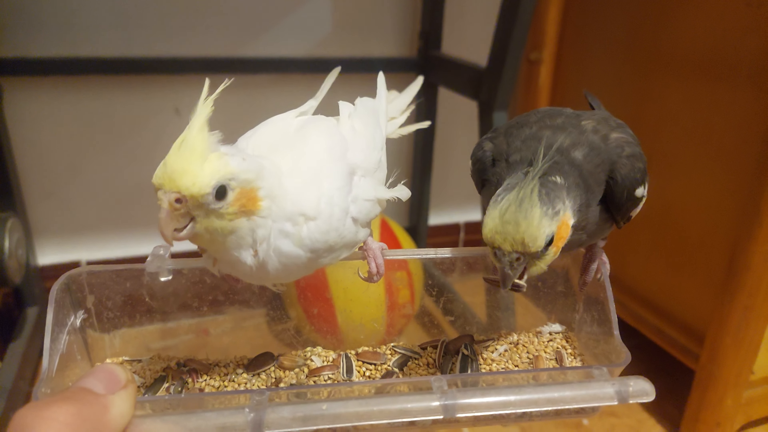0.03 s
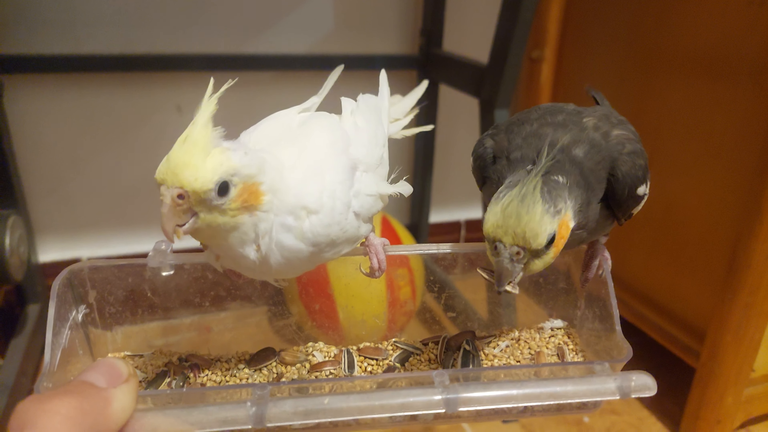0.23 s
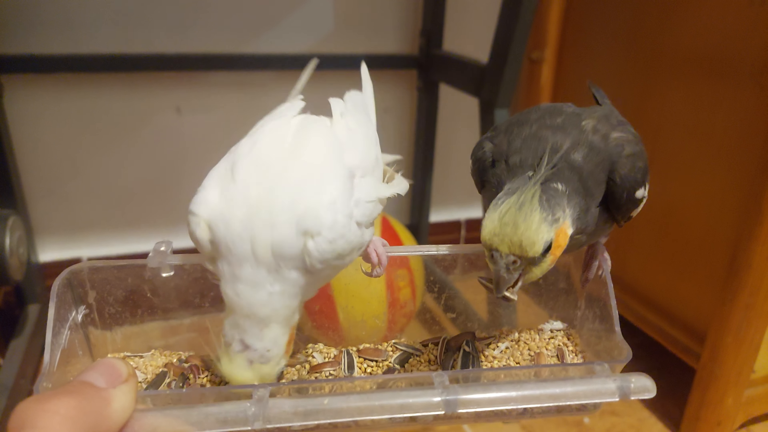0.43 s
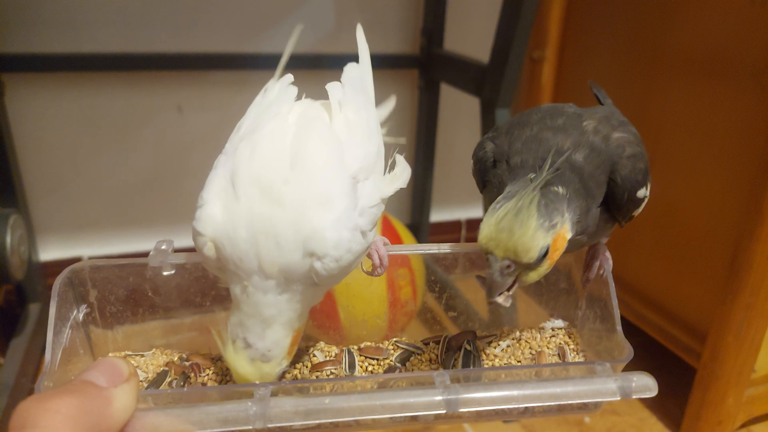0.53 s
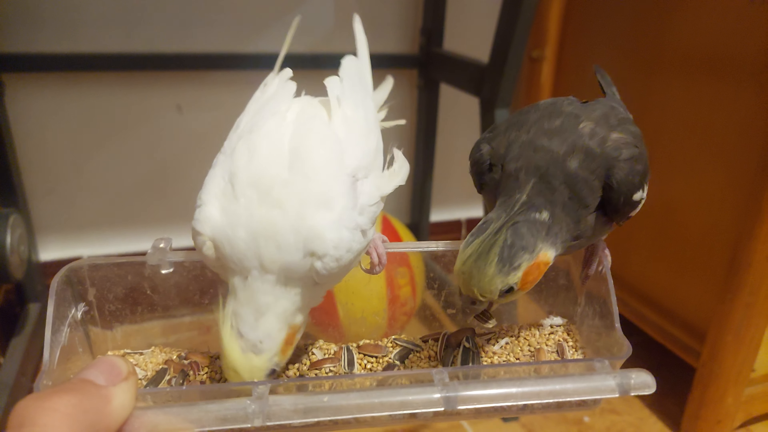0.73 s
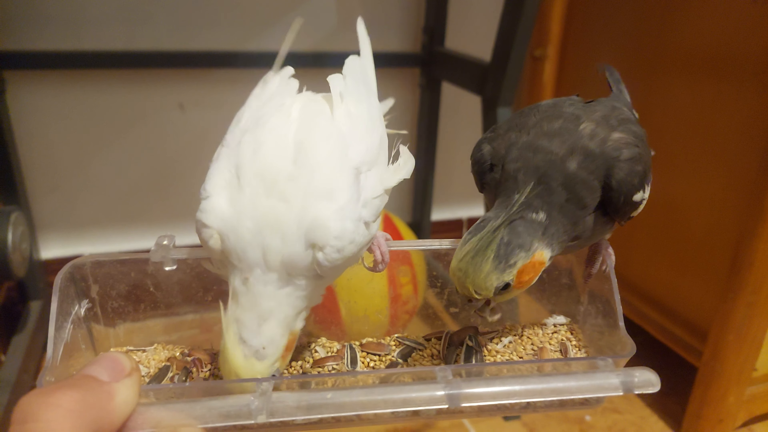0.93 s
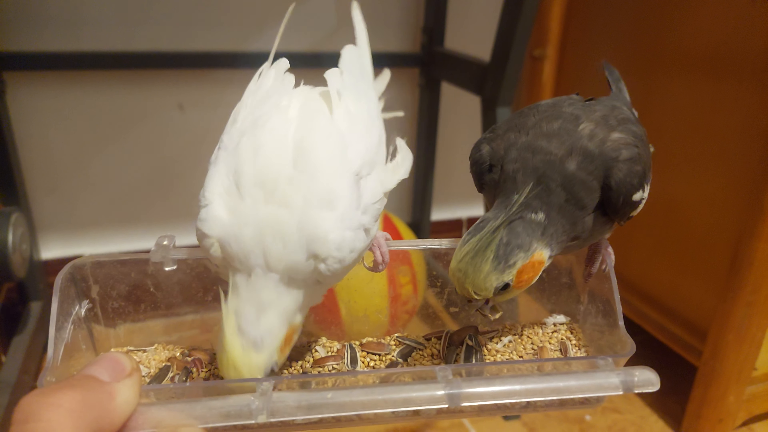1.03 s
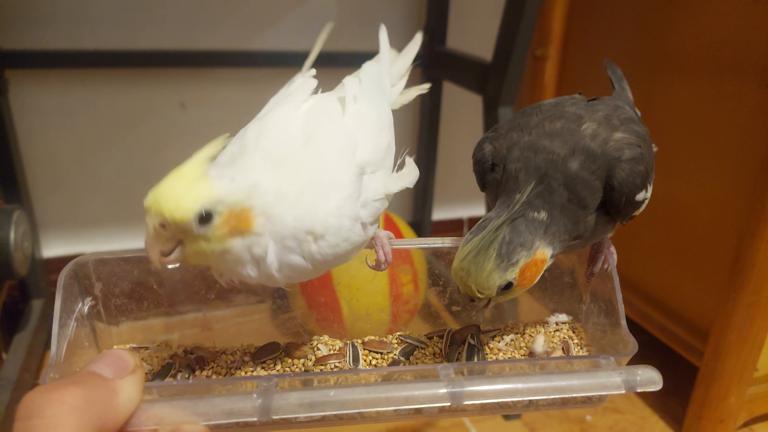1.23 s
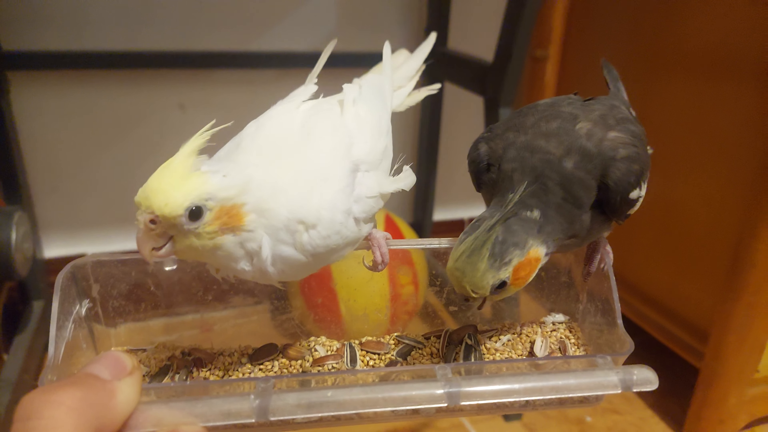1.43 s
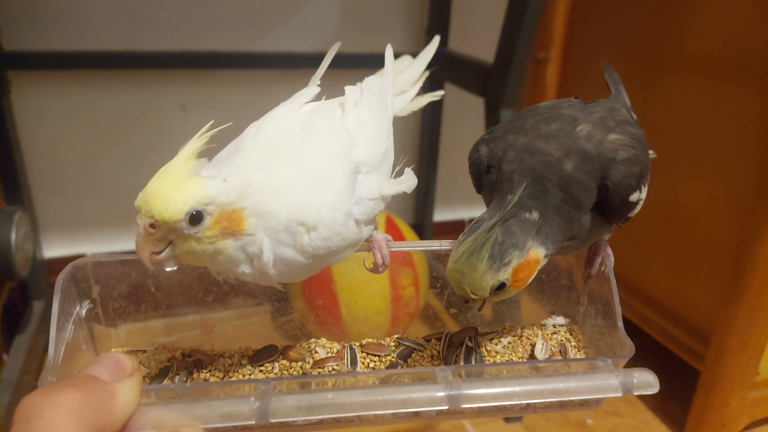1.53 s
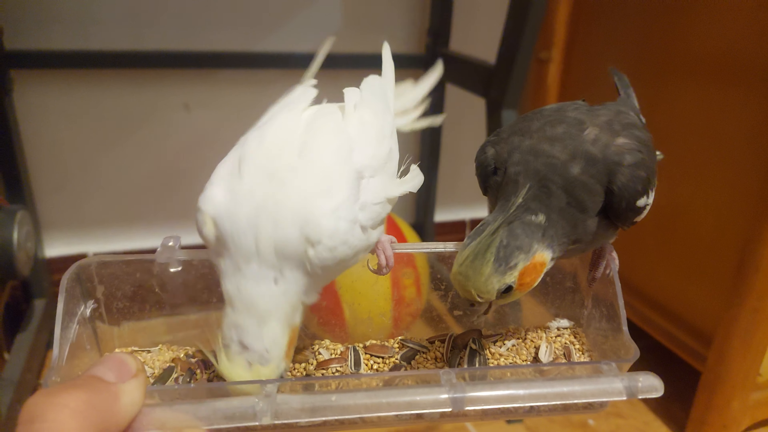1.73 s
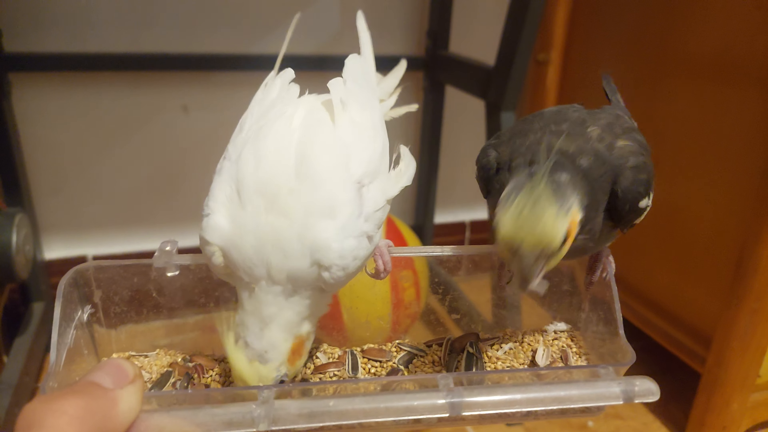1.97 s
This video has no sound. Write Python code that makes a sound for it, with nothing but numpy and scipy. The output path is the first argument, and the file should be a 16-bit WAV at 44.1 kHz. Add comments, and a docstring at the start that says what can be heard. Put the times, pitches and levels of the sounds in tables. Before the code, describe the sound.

Crisp snaps of seed husks come in uneven clusters as two birds feed close to the microphone. Faint seed rustles and beak taps on plastic run between them, with one soft thud halfway, over a quiet room's low rumble.

```python
"""A quiet room, the microphone close to a clear plastic seed tray where two cockatiels feed.
Their beaks stir loose seed, snap husks and knock on the tray; one peck rocks it with a soft thud.
Snaps reach the left side directly and the right mostly off nearby surfaces, which ring faintly,
and a short bright room tail follows. Two faint tones pass; a low rumble lies underneath."""
import sys
import numpy as np
from scipy import signal
from scipy.fft import rfft, irfft
from scipy.io import wavfile
from scipy.ndimage import uniform_filter1d

SR = 44100
rng = np.random.default_rng(int(sys.argv[2]) if len(sys.argv) > 2 else 0)


def output_pcm(signal):
    """Save a mono or channel-first signal as 16-bit PCM at the path in sys.argv[1].

    Samples are clipped to [-1, 1] before scaling.
    """
    pcm = np.clip(np.atleast_2d(signal).T, -1, 1) * 32767
    wavfile.write(sys.argv[1], SR, np.round(pcm).astype(np.int16))


N = 2 * SR

# Room rumble and hiss. Each row: frequency in Hz, relative level in dB.
ROOM_TONE_SPECTRUM = [(20, -18.5), (45, -4), (90, -1.5), (135, -0.5), (170, -10.5), (215, -3.5),
                      (270, -6.5), (380, -14), (600, -14), (900, -22.5), (1500, -21), (3000, -34.5),
                      (6000, -39), (12000, -36), (16000, -38)]
# Hum in the room. Each row: frequency in Hz, relative level in dB.
HUM_TONES = [(81, -79), (236, -85), (587, -87.5)]
# Swell and dip of the room tone's mids. Each row: time in seconds, gain in dB.
MIDS_GAIN = [(0, 1), (.42, 1), (.52, -5), (.74, -4.5), (.85, 0), (1.2, 2), (1.6, -.5), (2, 1)]
# Balance of the room tone. Each row: frequency in Hz, left over right in dB.
LEFT_LEAN = [(30, 15), (90, 11.5), (180, 6.5), (350, 6), (700, 6), (1400, -9), (3000, 4), (12000, -6)]
# Stirs of loose seed. Each row: start in seconds, length in seconds, relative level in dB,
# treble tilt at 11 kHz in dB.
SEED_STIRS = [(0.074, 0.047, -72, 1), (0.502, 0.055, -66.5, 6.5), (0.682, 0.06, -64.5, 5),
              (0.7, 0.014, -65.5, 7), (1.192, 0.047, -66.5, 2.5), (1.399, 0.12, -71.5, -10),
              (1.494, 0.094, -78.5, -13), (0.728, 0.39, -73.5, -11.5), (1.236, 0.1, -71.5, -10),
              (1.81, 0.14, -70.5, -1), (1.944, 0.053, -66, 2)]
# Colour of colliding seeds. Each row: frequency in Hz, relative level in dB.
SEED_SPECTRUM = [(300, -36), (900, -5), (1500, 4.5), (2100, 2.5), (2900, -8), (3800, -2.5), (5500, -4.5),
                 (8000, -1), (10000, -3), (12500, -1.5), (16000, -10)]
# Snapping husks. Each row: start in seconds, relative level in dB, splinter boost in dB,
# shell boost in dB, beak boost in dB, beak pitch in Hz.
HUSK_SNAPS = [(.0665, -57.5, 16, 8, 23.5, 2430), (0.0727, -57, 19, 11, 15, 2800),
              (0.0825, -47, 10, 6.5, 25, 2350), (0.098, -48, 8, 1, 17, 2470), (.1094, -55, 0, -7, 10, 2600),
              (.1321, -41.5, 16.5, 6, 11.5, 2360), (.1659, -53, -1, 6, 5, 2600),
              (.2300, -18.5, -4, -3.5, -20, 2320), (0.2359, -19, -7, -0.5, -10, 2300),
              (0.2641, -13.5, -3, -4, -5, 2340), (0.267, -25, 8, 3, 8, 2700),
              (.2704, -32.5, 5, 8, -1, 2400), (0.2788, -33, -13, -3, 6.5, 2400),
              (0.3325, -31.5, -10, 5, 5, 2600), (0.336, -35.5, -20, 6, 4, 2780),
              (0.339, -35.5, 0, 6, 1, 2600), (.341, -39, 2, 6, 4, 2900), (.3568, -61, -14, 6, 20, 2550),
              (0.5042, -62.5, -19, 23, 2, 2600), (0.5237, -51, 0, 10, -16, 2600),
              (0.5698, -38.5, 0, -3.5, 2.5, 2620), (0.5755, -43, -24, 3, 4.5, 2800),
              (0.6213, -56, 1, 11.5, 4, 2630), (0.8115, -65.5, -11, 18, 23.5, 3000),
              (.8156, -52.5, 5, -10, -2, 2600), (.837, -47, -2, -1.5, 19.5, 2480),
              (.8670, -22, 8, 7.5, 1.5, 2600), (.8702, -30, 7, 0, 2, 2290),
              (0.8739, -21.5, 2, -11, 6, 2440), (.9088, -16, 2, -16, -5, 2600),
              (.9152, -18, 3.5, -5.5, 6.5, 3560), (0.9894, -43.5, -8, 2, 2, 2200),
              (1.0218, -54, 5, 6, 1, 2600), (1.0288, -57, 7, -5, 16, 2560), (1.094, -58, 3, -10, -22, 2600),
              (1.1632, -57, -7, -1, 7, 2600), (1.1959, -50, 7, 12.5, 12.5, 2680),
              (1.2003, -42.5, 13, 5.5, 15.5, 2550), (1.2284, -51, 9, -12, 19, 2650),
              (1.2874, -40, 6, -3, 9, 2320), (1.324, -55, -1, -3, 20, 2600),
              (1.3576, -53.5, 9, 1, 20.5, 2700), (1.3855, -38.5, 7, 11, 2.5, 2600),
              (1.394, -55, -5, 2, 6, 2500), (1.3958, -41, 16, 8.5, 6, 2600),
              (1.4, -43.5, -6, 1.5, 21, 2520), (1.4044, -51, -2, 5, 18, 2420),
              (1.4513, -46.5, 11, 1, 17.5, 2500), (1.4764, -56, 6, 2, 21, 2600),
              (1.487, -58.5, -1.5, 4, 24.5, 2690), (1.5606, -66, 11, 6, 30, 2580),
              (1.5684, -64, 16, 18.5, 18, 2500), (1.7481, -71.5, 8, 18.5, 6, 2600)]
# Colour of a snap before those boosts. Each row: frequency in Hz, relative level in dB.
HUSK_SPECTRUM = [(300, -39.5), (1500, -42.5), (3000, -29.5), (5000, -22.5), (7000, -13.5), (8600, -9),
                 (9600, -9), (10800, -4), (12200, 2), (13500, -1.5), (15000, -4), (17000, -18.5)]
# Ringing after a snap. Each row: frequency in Hz, relative level in dB, 60 dB decay in seconds.
AFTER_RING_MODES = [(2417, -5, 0.16), (2749, 0, 0.2), (3100, -6, 0.17), (4280, -3, 0.17), (4905, -6, .22),
                    (5700, 3, 0.18)]
# Beaks on tray and seed. Each row: start in seconds, relative level in dB, pitch in Hz,
# 60 dB decay of the ring in seconds.
BEAK_KNOCKS = [(0.0823, -54, 2090, .004), (.083, -55, 3650, 0.002), (.2645, -49, 2460, .03),
               (0.5062, -59.5, 1670, 0.0064), (.522, -63, 1680, 0.0075), (0.7024, -50, 2056, 0.073),
               (0.8388, -60.5, 2100, 0.0072), (0.8676, -59.5, 1300, .015), (.868, -54.5, 2040, 0.019),
               (0.874, -54, 1880, .01), (0.9151, -43.5, 1410, 0.015), (0.9164, -45, 2060, 0.00437),
               (.9155, -44.5, 3800, .006), (0.915, -42.5, 6000, 0.0044), (1.2005, -64.5, 2120, .006),
               (1.2765, -57, 2220, .008), (1.2874, -54.5, 4500, 0.015), (1.3856, -40.5, 2830, 0.0025),
               (1.3971, -46, 2970, 0.0034), (1.4005, -47.5, 2550, 0.0022), (1.5654, -55.5, 2640, .01),
               (1.8512, -52.5, 1445, .014), (1.8505, -53, 1950, 0.018), (1.899, -48, 1750, 0.0085),
               (1.956, -55, 1720, 0.011), (1.964, -58.5, 1950, 0.013), (1.975, -54, 1640, .01)]
# Body of a knock. Each row: multiple of its pitch, relative level in dB.
KNOCK_SPECTRUM = [(.1, -26.5), (.5, -15.5), (.7, -14), (.85, -1), (1.0, 4.5), (1.17, -3), (1.4, -20.5),
                  (2.2, -23.5), (4.5, -24.5), (10, -55)]
# Faint ringing tones. Each row: start in seconds, length in seconds, pitch in Hz, peak level in dB.
FAINT_TONES = [(1.114, 0.19, 1060, -75.5), (1.341, 0.13, 1563, -67)]
# Paths to the microphone, left then right. Each row: gains in dB for direct sound, near surfaces,
# furniture and room tail.
MIC_PATHS = [(0.5, -7.5, -10.5, -11), (-67, -3, -8.5, -10)]
# Colour of the room tail. Each row: frequency in Hz, gain in dB.
TAIL_SPECTRUM = [(500, -5), (1500, 3.5), (3000, 6.5), (5000, 0), (7500, -4), (12000, -9.5), (16000, -2.5)]
# Colour of the shadowed right side. Each row: frequency in Hz, gain in dB.
RIGHT_SHADOW = [(300, -12.5), (1500, 7), (4000, 2), (6500, -0.5), (8700, -6), (11000, -1), (13200, 3.5),
                (15000, 1.5), (16500, -8.5)]


def undb(db):
    """Decibels to gain."""
    return 10 ** (np.asarray(db) / 20)


def unit(x):
    """Scale to unit energy."""
    return x / np.sqrt(np.sum(x ** 2))


def fade(t, t60):
    """Exponential decay by 60 dB in t60 seconds."""
    return np.exp(-np.log(1000) * t / t60)


def bump(hz, centre_hz, octaves):
    """A broad resonance, 1 at its centre."""
    return np.exp(-(np.log2(hz / centre_hz) / octaves) ** 2)


def spectrum(points, size=512):
    """Spread (Hz, dB) points over FFT bins; return the levels and the bins' frequencies."""
    hz = np.maximum(np.arange(size // 2 + 1) * SR / size, 1)
    point_hz, point_db = np.array(points, float).T
    return np.interp(np.log(hz), np.log(point_hz), point_db), hz


def impulse(db):
    """The minimum-phase impulse response with this spectrum."""
    cepstrum = irfft(np.log(undb(db)))
    half = len(cepstrum) // 2
    cepstrum[1:half] *= 2
    cepstrum[half + 1:] = 0
    return irfft(np.exp(rfft(cepstrum)))


def through(x, response):
    """Filter a sound by an impulse response, keeping its length."""
    return signal.fftconvolve(x, response)[:len(x)]


def add(out, start_s, x):
    """Mix a sound in at a given time."""
    i = int(start_s * SR)
    out[i:i + len(x)] += x[:len(out) - i]


def burst(envelope):
    """Noise of unit energy under an envelope, evened out in spectrum and in time."""
    x = rng.standard_normal(len(envelope))
    for _ in range(2):
        bins = rfft(x * envelope)
        x = irfft(bins / (abs(bins) + 1e-12), len(x))
        x = x / np.sqrt(np.abs(uniform_filter1d(x ** 2, size=32)) + 1e-18)
    return unit(x * envelope)


def contact(decay_s, rough_db):
    """One sharp push and a quickly dying roughness, with the energy of a millisecond at full level."""
    t = np.arange(1024) / SR
    push = undb(rough_db) * burst(np.exp(-t / decay_s) * np.minimum(t / decay_s, 1))
    push[0] += 1
    return unit(push) * np.sqrt(SR / 1000)


def room_tone(shared_power=0.32, waver_db=4, waver_s=0.09):
    """Low rumble and a weak wavering hum, both stronger on the left, with a thin hiss."""
    t = np.arange(N) / SR
    colour_db, bin_hz = spectrum(ROOM_TONE_SPECTRUM, size=N)
    noise = rng.standard_normal((3, N))
    stereo = np.sqrt(shared_power) * noise[0] + np.sqrt(1 - shared_power) * noise[1:]
    rumble = irfft(rfft(stereo) * undb(colour_db))
    bed = rumble / rumble.std() * undb(-66.5)
    for hz, db in HUM_TONES:
        waver = np.interp(t / waver_s, np.arange(256), rng.standard_normal(256))
        bed += undb(db + waver_db * waver) * np.sqrt(2) * np.sin(2 * np.pi * (hz * t + rng.random()))
    mids = irfft(rfft(bed) * bump(bin_hz, centre_hz=540, octaves=0.92))
    mids_db = np.interp(t, *np.array(MIDS_GAIN).T)
    bed += mids * (undb(mids_db) - 1)
    lean_db, _ = spectrum(LEFT_LEAN, size=N)
    return irfft(rfft(bed) * undb(np.array([lean_db, -lean_db]) / 2))


def seed_grains(hits_per_s=1700, spread_db=6):
    """Tiny seed collisions of uneven size, rms 1."""
    hits = rng.random(N) < hits_per_s / SR
    hits[0] = True
    sizes = undb(spread_db * np.clip(rng.standard_normal(N), -2, 2))
    signs = rng.choice([-1, 1], size=N)
    return unit(hits * sizes * signs) * np.sqrt(N)


def seed_rustle(nibble_db=-81):
    """Seeds tumble as a beak digs in; a faint nibbling goes on throughout."""
    seed_db, hz = spectrum(SEED_SPECTRUM)
    out = undb(nibble_db) * through(seed_grains(), unit(impulse(seed_db)))
    for start_s, length_s, db, treble_db in SEED_STIRS:
        count = int(length_s * SR)
        tumble = seed_grains()[:count] * signal.windows.tukey(count, 0.5)
        colour = unit(impulse(seed_db + treble_db * hz / (SR / 4)))
        add(out, start_s, undb(db - 0.5) * signal.fftconvolve(tumble, colour))
    return out


def husk_snaps():
    """Husks snap brightly and fibres tear just after; some splinter, some sound the shell and beak."""
    out = np.zeros(N)
    husk_db, hz = spectrum(HUSK_SPECTRUM)
    splinter = bump(hz, centre_hz=15250, octaves=0.13)
    shell = bump(hz, centre_hz=6800, octaves=0.42)
    husk_gain = np.sqrt(np.sum(impulse(husk_db) ** 2))
    for start_s, db, splinter_db, shell_db, beak_db, beak_hz in HUSK_SNAPS:
        beak = bump(hz, beak_hz, octaves=0.28) + bump(hz, 1.53 * beak_hz, octaves=0.76)
        body = impulse(husk_db + splinter_db * splinter + shell_db * shell + beak_db * beak) / husk_gain
        tear = contact(decay_s=0.00033, rough_db=-2.5)
        add(out, start_s, undb(db - 4.5) * through(tear, body))
    return out


def after_ring(gain_db=-55):
    """Faint pitched ringing from nearby surfaces after each snap, in step with its strength."""
    out, t = np.zeros(N), np.arange(SR // 4) / SR
    modes = sum(undb(db) * np.sin(2 * np.pi * hz * t) * fade(t, t60) for hz, db, t60 in AFTER_RING_MODES)
    for start_s, db, *_ in HUSK_SNAPS:
        add(out, start_s, undb(db + gain_db) * modes)
    return out


def beak_knocks(ring_db=-12):
    """A beak meets the plastic floor or a hard seed; pitch and ring depend on the spot."""
    out, t = np.zeros(N), np.arange(4096) / SR
    for start_s, db, hz, t60 in BEAK_KNOCKS:
        body_db, _ = spectrum([(ratio * hz, level) for ratio, level in KNOCK_SPECTRUM], size=len(t))
        ring = undb(ring_db) * np.cos(2 * np.pi * hz * t) * fade(t, t60)
        body = unit(unit(impulse(body_db)) + ring)
        strike = contact(decay_s=0.00046, rough_db=-1)
        add(out, start_s, undb(db - 2.5) * through(body, strike))
    return out


def tray_thud(start_s=1, hz=135, rise_s=0.014, left_over_right_db=14):
    """One hard peck rocks the whole tray: a soft low thud, left of the microphone."""
    t = np.maximum(np.arange(N) / SR - start_s, 0)
    sway = np.sin(2 * np.pi * hz * t) * (1 - np.exp(-t / rise_s)) * fade(t, t60=0.22)
    return sway * undb(-57 + left_over_right_db * np.array([[0.5], [-0.5]]))


def faint_tones():
    """Thin tones swell and die away, dead centre."""
    out = np.zeros(N)
    for start_s, length_s, hz, db in FAINT_TONES:
        t = np.arange(int(length_s * SR)) / SR
        add(out, start_s, undb(db) * np.sin(np.pi * t / length_s) * np.sin(2 * np.pi * hz * t))
    return out


def mic_responses(clump_db=3.5, clump_s=0.0013, bounce_s=0.001674, right_lag_s=0.0003):
    """From one spot to each side of the microphone: direct sound, near surfaces, furniture, room tail."""
    t, responses = np.arange(16384) / SR, []
    late = np.clip(t / 0.003 - 0.5, 0, 1)  # near reflections give way to later ones around 3 ms
    bounce = undb(-7.5) * np.exp(-((t - bounce_s) / 0.00016) ** 2)
    tail_colour = impulse(spectrum(TAIL_SPECTRUM)[0])
    lowpass = signal.ellip(6, 0.5, 50, 15850, fs=SR, output="sos")
    for is_right, (direct_db, near_db, furniture_db, tail_db) in enumerate(MIC_PATHS):
        clumps = undb(clump_db * np.interp(t / clump_s, np.arange(1024), rng.standard_normal(1024)))
        near = undb(near_db) * burst(np.exp(-t / 0.0047) * (1 - late) + is_right * bounce)
        furniture = undb(furniture_db) * burst(late * clumps * fade(t, t60=0.12))
        tail = undb(tail_db) * through(burst(late * fade(t, t60=0.3)), tail_colour)
        response = signal.sosfilt(lowpass, near + furniture + tail)
        response[0] += undb(direct_db)
        if is_right:  # this side hears later, and in shadow
            delayed = np.concatenate([np.zeros(int(right_lag_s * SR)), response])
            response = through(delayed, impulse(spectrum(RIGHT_SHADOW)[0]))
        responses.append(response)
    return responses


def moving_heads(x, spots):
    """The heads keep moving, so each stretch of sound comes from a new spot with its own reflections."""
    out, step = np.zeros((2, N)), N // spots
    for start in range(0, N, step):
        for side, response in zip(out, mic_responses()):
            add(side, start / SR, signal.fftconvolve(x[start:start + step], response))
    return out


def scene():
    """The feeding birds up close, over room tone; the tray faces both sides of the microphone."""
    knocks = beak_knocks()
    direct_knocks = undb([[-11], [-5.5]]) * knocks  # left, right
    feeding = husk_snaps() + after_ring() + undb(-5.5) * knocks + seed_rustle()
    return moving_heads(feeding, spots=10) + direct_knocks + tray_thud() + faint_tones() + room_tone()


def record(dry):
    """The recorder cuts the treble steeply above 16.6 kHz."""
    return signal.sosfilt(signal.ellip(8, 0.2, 70, 16600, fs=SR, output="sos"), dry)


dry = scene()
out = record(dry)
output_pcm(out)
```